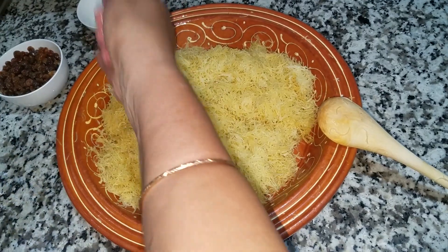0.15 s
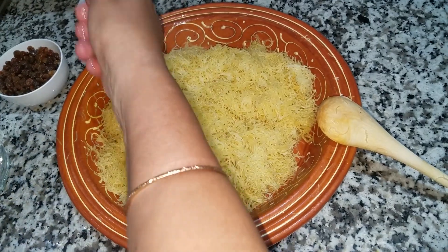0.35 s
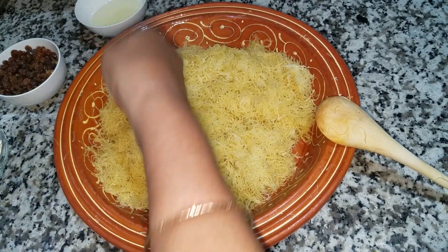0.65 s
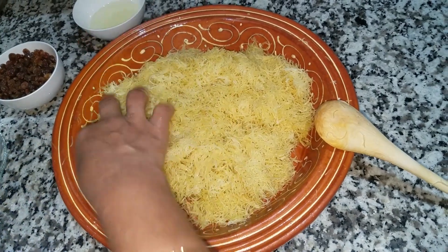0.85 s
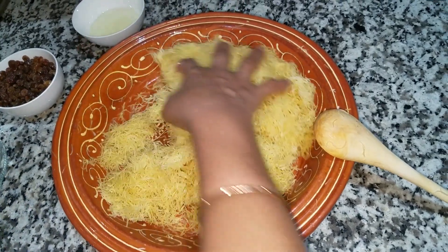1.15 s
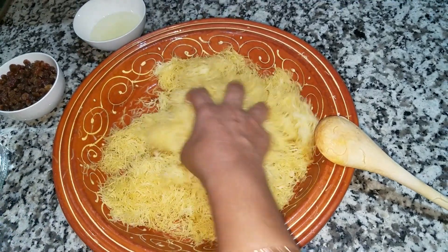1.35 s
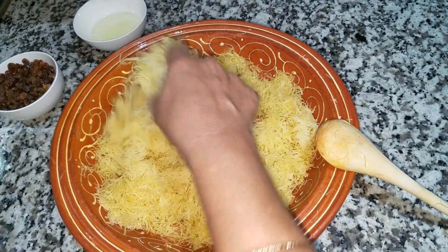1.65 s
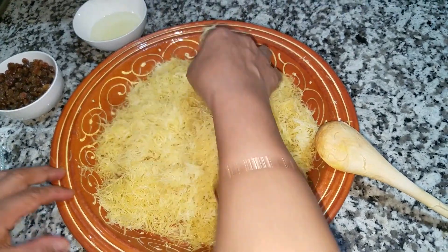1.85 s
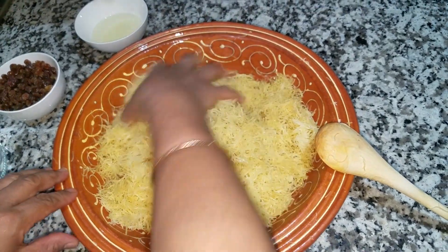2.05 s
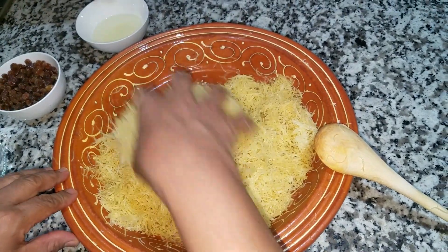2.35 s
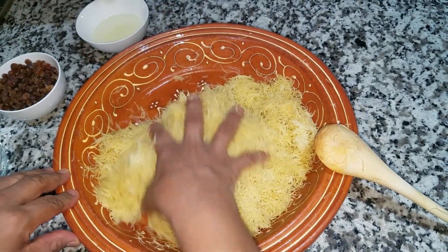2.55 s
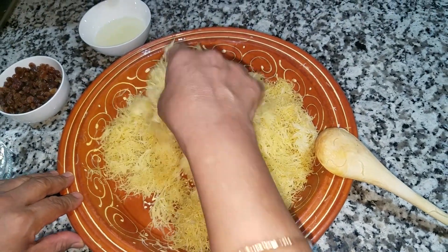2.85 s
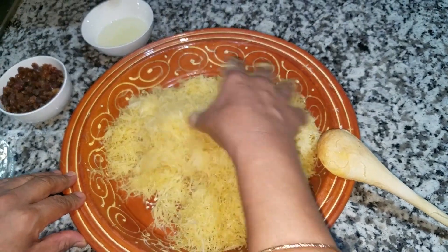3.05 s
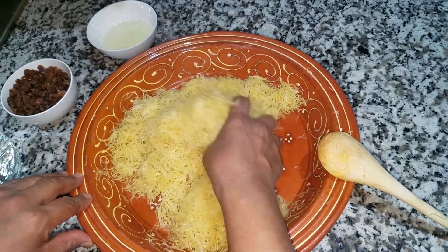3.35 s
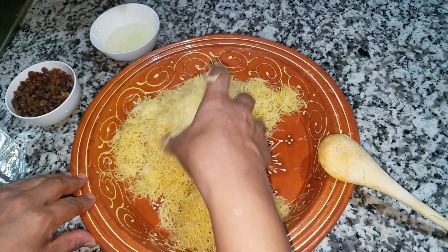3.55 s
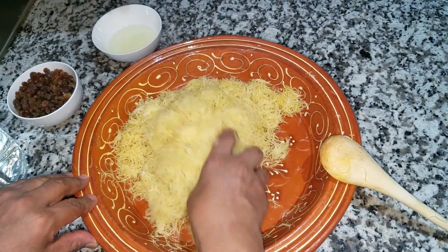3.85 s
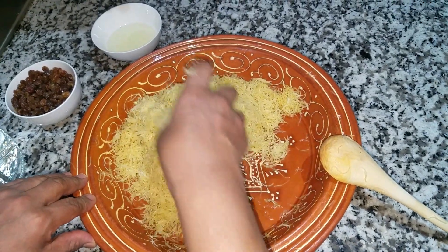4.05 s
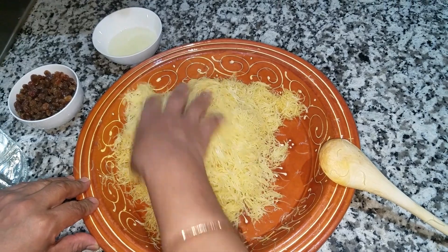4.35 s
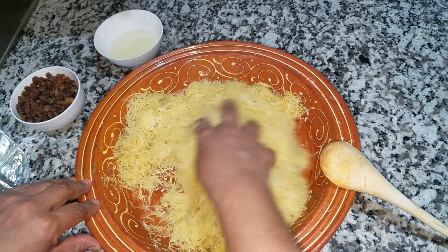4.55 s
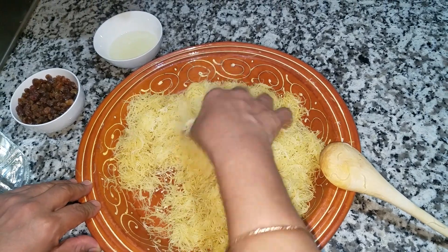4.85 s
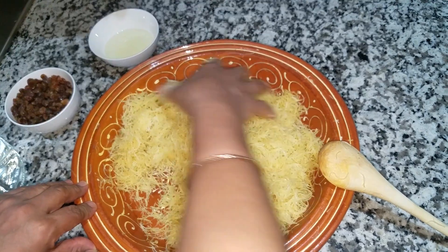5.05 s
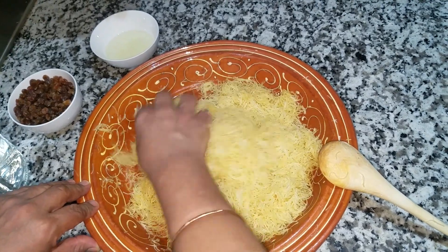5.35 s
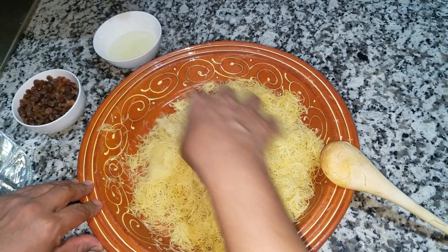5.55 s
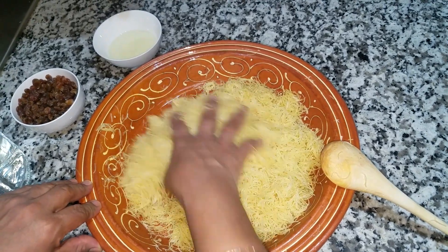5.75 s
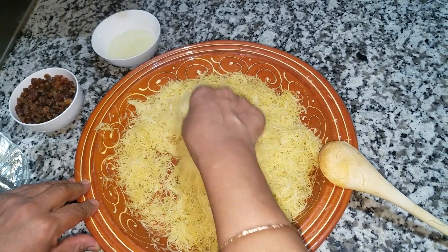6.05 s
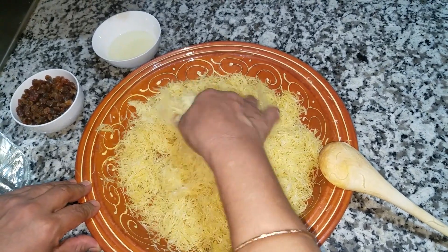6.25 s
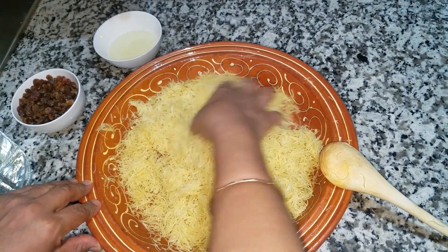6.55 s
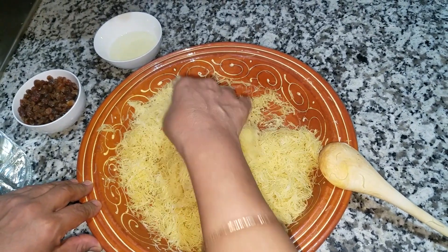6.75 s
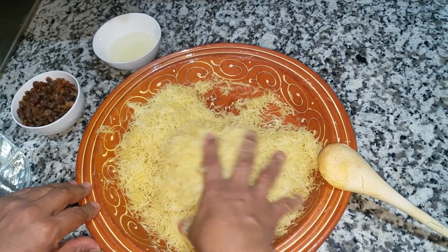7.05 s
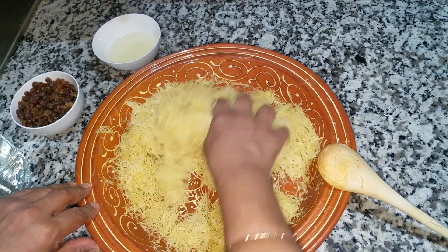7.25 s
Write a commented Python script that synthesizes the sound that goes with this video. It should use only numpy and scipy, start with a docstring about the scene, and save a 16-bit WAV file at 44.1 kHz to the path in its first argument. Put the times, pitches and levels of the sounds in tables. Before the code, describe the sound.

An earthenware dish knocks hard on a stone counter, then a hand rubs and tosses damp vermicelli with soft flops over a low hum

```python
"""A hand rubs and tosses damp steamed vermicelli in a wide earthenware dish on a stone counter.
Throughout: strands crackle and flop (shaped noise grains), snaps and thin tones (short sines), a hum over air.
First second: three hard dish knocks on the stone (damped thud modes, noise crack, beating clay modes).
From 2 s: bangle or nail clacks and fingertip bumps (short sines, rim modes, noise snap).
At 5.2 s: two softer knocks. A small hard kitchen (decaying noise) answers all but the humming appliance."""
import sys
import numpy as np
from scipy import signal
from scipy.fft import rfft, irfft, next_fast_len
from scipy.io import wavfile
from scipy.ndimage import uniform_filter1d

SR = 44100
rng = np.random.default_rng(int(sys.argv[2]) if len(sys.argv) > 2 else 0)


def file_out(sig):
    """Save sig as 16-bit WAV at sys.argv[1]."""
    # one column per channel
    cols = np.atleast_2d(sig).T
    # limit, then scale
    lim = np.clip(cols, -1, 1)
    pcm = np.round(lim * 32767).astype(np.int16)
    wavfile.write(sys.argv[1], SR, pcm)


N = 326117
TIME = np.arange(N) / SR
BRIEF = TIME[:SR]  # 1 s, long enough for one event
SIDES = np.array([[1], [-1]])  # left, right
# every pan_db is left minus right


# dead thud of dish and counter together: pitch_hz, t60_s, level_db (relative)
THUD_MODES = [(111.4, 0.15, -19.5), (235, 0.026, -12.5), (351, 0.04, -3.5), (487, 0.024, 3),
              (747, 0.016, 7), (991, 0.026, 1.5), (1304, 0.011, 9), (1833, 0.033, 2)]
# colour of the crack: freq_hz, level_db
CRACK_COLOUR = [(100, 1), (900, -8.5), (2200, -4), (3200, -12), (5000, -13.5), (8000, -15), (15000, -27)]
FOOT_HZ = 92  # the dish is too small to radiate below this
THUD_RISE_S, RING_RISE_S = .0009, .003  # time constants: the blow spreads through the dish


def knocks(crack_t60_s=0.084, lag_s=0.00023):
    """The foot of the dish hits the stone: thud and crack, dulled by a soft landing, then the clay rings."""
    thuds, rings = np.zeros((2, N)), np.zeros((2, N))
    hz, t60_s, mode_db = np.transpose(THUD_MODES)
    turn = np.pi * np.arange(len(THUD_MODES))[:, None]  # neighbouring modes swing in opposite directions
    half_lag = np.pi * hz[:, None] * lag_s
    thud = np.array([ring(hz, t60_s, mode_db, turn + side * half_lag) for side in (1, -1)])
    thud_rise = 1 - np.exp(-BRIEF / THUD_RISE_S)
    ring_rise = 1 - np.exp(-BRIEF / RING_RISE_S)
    radiate = signal.butter(2, FOOT_HZ, "high", fs=SR, output="sos")
    for s, level_db, contact_hz, crack_db, pan_db in bounces():
        crack = unit(colour(diffuse(SR), CRACK_COLOUR)) * undb(crack_db - 60 * BRIEF / crack_t60_s)
        soften = signal.butter(2, contact_hz, fs=SR, output="sos")
        blow = signal.sosfilt(np.vstack([soften, radiate]), (thud + crack) * thud_rise)
        add(thuds, s, pan(undb(level_db) * blow, pan_db))
    for (s, _, _, ring_db, *_), spot in zip(KNOCKS, KNOCK_SPOTS):
        add(rings, s, undb(ring_db) * clay(spot) * ring_rise)
    ring_echo = kitchen(rings, early_db=-19, late_db=-17)
    thud_echo = kitchen(thuds, early_db=-1.5, late_db=-2.5)
    return thuds + rings + ring_echo + thud_echo


# the dish lands and rocks: start_s, thud_db, contact_cutoff_hz, ring_db, crack_db (relative),
# pan_db, first_gap_s, step_db (per bounce)
KNOCKS = [(0.33, -13, 2400, 1, -7, 3, .0048, -7), (.383, -18.5, 2200, -13.5, -23.5, 6, .008, -5.5),
          (0.7075, -19, 2100, -.5, -7.5, 3.5, .004, -2.5), (5.1881, -25, 937, 1, -0.5, -5, .02, -6.5),
          (5.251, -32.5, 1150, -32, -5, 0, .024, -14)]
# spot of the foot that lands at each knock: index 0..2
KNOCK_SPOTS = [0, 0, 1, 2, 2]
BOUNCE_SHRINK = 0.89  # each gap as a share of the one before


def bounces(count=3):
    """Each knock is a run of contacts, ever weaker and closer together."""
    for s, level_db, contact_hz, _, crack_db, pan_db, gap_s, step_db in KNOCKS:
        for k in range(count):
            yield s, level_db + k * step_db, contact_hz, crack_db, pan_db
            s = s + gap_s * BOUNCE_SHRINK ** k


# ring of the dish: pitch_hz, t60_s, twin_db (relative), spot0_db, spot1_db, spot2_db
DISH_MODES = [(124, 0.31, -6.5, -36.5, -39, -31), (208.3, 0.33, -4.5, -25, -30.5, -33.5),
              (297.5, 0.29, -11.5, -22.5, -47, -34.5), (349, 0.28, -8, -21, -20.5, -25.5),
              (430, 0.22, -9, -30.5, -23, -40), (496, 0.28, -16, -27, -41, -24),
              (548.4, 0.38, -21.5, -27.5, -26, -36), (580, 0.29, -22, -34, -28, -44),
              (655, 0.3, -10, -33, -34, -50), (708, 0.17, -10.5, -40, -29.5, -30.5),
              (768, 0.17, -25, -38, -31, -54), (876, 0.51, -33.5, -27.5, -36.5, -51),
              (915, 0.65, -1, -24.5, -49, -65), (1015, 0.27, -10.5, -28, -49, -54),
              (1273, 0.94, -10, -40, -56, -59.5), (1426, 0.28, -13, -14, -31, -46),
              (1600, 0.49, -9.5, -38, -47.5, -58), (1600, 0.31, -13, -46, -59, -54),
              (1774, 0.33, 3, -35, -31, -61), (2037, 0.42, 3, -30.5, -39.5, -72),
              (2195, 0.62, 0, -43.5, -52, -63), (3190, 0.32, -16, -41, -56, -66),
              (3440, 0.49, -3.5, -48.5, -59, -76), (4160, 0.87, -5.5, -59, -63, -83),
              (5100, 0.27, -10, -66.5, -70.5, -83), (6180, 0.22, 0.5, -58, -58, -84)]


def clay(spot, split=0.00645, lean_db=-5.5):
    """The dish is not quite round, so each ringing mode beats with a close twin."""
    hz, t60_s, twin_db, *spot_db = np.transpose(DISH_MODES)
    # short waves leave in different phase and strength to left and right
    apart = np.minimum(hz / 1400, 1)
    lag = (0.79 * apart * rng.choice([-1, 1], len(hz)))[:, None]
    start = rng.uniform(0, 2 * np.pi, (len(hz), 1))
    ears = []
    for side in (1, -1):
        level_db = spot_db[spot] + side * apart * lean_db / 2
        phase = start + side * lag
        twin = ring(hz * (1 - split), t60_s, level_db + twin_db, phase)
        ears.append(ring(hz, t60_s, level_db, phase) - twin)
    return np.array(ears)


# ring of a light hard tap on the rim: pitch_hz, t60_s, level_db (relative)
RIM_MODES = [(809, 0.034, -7), (843, 0.09, -19), (1546, 0.043, -11), (1626, 0.4, -31), (2140, 0.15, -23),
             (2490, 0.091, -13), (2610, 0.25, -23), (3070, 0.053, -19.5), (3700, 0.13, -27),
             (3940, 0.047, -17), (5290, 0.043, -22), (7000, 0.15, -32), (8200, 0.076, -29)]
# colour of snap and graze: freq_hz, level_db
SNAP_COLOUR = [(200, 3), (1000, 13.5), (2800, 0.5), (4500, -4), (6000, -16), (12000, -10), (15500, -17)]
SING_DB, SING_T60_S = -12, 0.16  # the main pitch lingers


def taps(clack_t60_s=0.017, snap_db=-9, snap_t60_s=0.08, graze_db=-17, graze_s=0.01):
    """Each light contact grazes, then snaps, clacks, sings on and excites its own mix of rim modes."""
    out = np.zeros((2, N))
    hz, t60_s, mode_db = np.transpose(RIM_MODES)
    for s, tap_db, main_hz, rim_db, pan_db in touches():
        tap_hz = hz * (1 + .01 * rng.standard_normal(len(hz)))
        tap_mode_db = mode_db + 1.2 * rng.standard_normal(len(hz))
        phases = rng.uniform(0, 2 * np.pi, (2, len(hz), 1))
        rim = np.array([ring(tap_hz, t60_s, tap_mode_db, phase) for phase in phases])
        grit = unit(colour(rng.standard_normal((2, SR)), SNAP_COLOUR))
        snap = grit * undb(snap_db - 60 * BRIEF / snap_t60_s)
        clack = ring(main_hz, clack_t60_s, 0) + ring(main_hz, SING_T60_S, SING_DB)
        add(out, s, pan(undb(tap_db) * (clack + undb(rim_db) * (rim + snap)), pan_db))
        # the skid over the glaze swells until the strike
        graze = grit * undb(tap_db + rim_db + graze_db) * np.exp((BRIEF - 1) / graze_s)
        add(out, s - 1, graze)
    # a light touch cannot shake the whole dish
    out = signal.sosfilt(signal.butter(2, 300, "high", fs=SR, output="sos"), out)
    return out + kitchen(out, early_db=-2.5, late_db=-7.0)


# bangle or nail strikes the rim and falls back on it: start_s, level_db, pitch_hz, rim_db (relative),
# pan_db, rebound_gap_s, rebound_db (relative), rebound_pitch_hz
CLACKS = [(1.954, -40.5, 1150, 3.5, -3, .039, -1, 2170), (2.636, -42.5, 840, 6, -1, 0.016, -2.5, 1550),
          (3.3153, -36.5, 1552, 0, -2, 0.02, -5.5, 837), (3.834, -42, 1554, 0, -4, .005, -4.5, 2530),
          (6.5996, -30, 1680, 2.5, 12, .0142, -2, 863)]
# fingertips bump the dish through the strands: start_s, level_db, pitch_hz
BUMPS = [(1.974, -37, 490), (3.725, -43, 1100), (4.388, -43.5, 535), (4.469, -43, 517), (6.477, -37.5, 490),
         (6.5212, -37.5, 494)]
BRUSH_S, BRUSH_DB, BRUSH_RIM_DB, BRUSH_HZ = .005, -12.5, 6, 853  # light first brush, this long before
REBOUND_RIM_DB, REBOUND_PAN = -1.5, .6  # less rim; share of the strike's pan_db
BUMP_RIM_DB, BUMP_PAN_DB = -6.5, 0.5


def touches():
    """Bangle or nail brushes, strikes and rebounds; a fingertip bumps once."""
    for s, level_db, hz, rim_db, pan_db, gap_s, rebound_db, rebound_hz in CLACKS:
        yield s - BRUSH_S, level_db + BRUSH_DB, BRUSH_HZ, rim_db + BRUSH_RIM_DB, 0
        yield s, level_db, hz, rim_db, pan_db
        yield s + gap_s, level_db + rebound_db, rebound_hz, rim_db + REBOUND_RIM_DB, pan_db * REBOUND_PAN
    for s, level_db, hz in BUMPS:
        yield s, level_db, hz, BUMP_RIM_DB, BUMP_PAN_DB


# strokes of the hand: peak_s, rub_db, flop_db (both before STRAND_DB), swell_s
STROKES = [(.235, -62, -76.5, .06), (.58, -63.5, -66.5, 0.099), (1.38, -68.5, -59, 0.064),
           (2.1, -69, -56, 0.046), (2.7, -72, -64, .09), (3.28, -70, -70, .06), (3.7, -70, -60, 0.12),
           (4.5, -73, -56.5, 0.049), (5.26, -60, -66, 0.035), (5.82, -72, -58.5, 0.083),
           (6.5, -67, -54, 0.025), (7.19, -70, -52.5, 0.027)]
# colours of crackle and of falling handfuls: freq_hz, level_db
RUB_COLOUR = [(500, -11), (2000, 2), (4000, 2), (7000, -2.5), (10000, -0.5), (15000, 2)]
FLOP_COLOUR = [(150, -4), (480, 0.5), (620, -4), (830, 5.5), (1150, -3.5), (1550, 0), (2200, -14.5),
               (5000, -24.5), (15000, -29.5)]
RUB_LAG_S = .025  # the crackle peaks just after the handful lands
STRAND_DB = -5.5  # direct sound only


def vermicelli(rub_pan_db=2):
    """Damp strands crackle under the fingers and flop softly back into the dish."""
    rub_effort, flop_effort = np.zeros(N), np.zeros(N)
    for s, rub_db, flop_db, swell_s in STROKES:
        rub_effort += undb(rub_db) * swell(s + RUB_LAG_S, swell_s)
        flop_effort += undb(flop_db) * swell(s, swell_s)
    rubbing = strands(rub_effort, RUB_COLOUR, per_s=3800, spread_db=5.5)
    falling = strands(flop_effort, FLOP_COLOUR, per_s=820, spread_db=2.5)
    out = pan(rubbing, rub_pan_db) + falling
    return undb(STRAND_DB) * out + kitchen(out, early_db=-5, late_db=-2.5)


def strands(effort, points, per_s, spread_db):
    """A crowd of tiny contacts of uneven size, swelling with each stroke of the hand."""
    sizes = undb(spread_db * np.minimum(rng.exponential(size=N), 5))
    sizes = sizes * (rng.random(N) < per_s / SR)
    shared, separate = rng.standard_normal(N), rng.standard_normal((2, N))
    return effort * unit(colour(sizes * (shared + 2.5 * separate), points))


RELEASE = 1.46  # fall time / rise time


def swell(s, swell_s):
    """Effort of one stroke: a bell curve up to time s that lets go more slowly."""
    width_s = np.where(TIME < s, swell_s, RELEASE * swell_s)
    return np.exp(-.5 * ((TIME - s) / width_s) ** 2)


# clearest tiny snaps and longer thin tones: start_s, level_db, pitch_hz, t60_s, pan_db
TICKS = [(.0952, -43, 7500, 0.00088, 15), (0.1825, -48, 12600, .003, 14), (.209, -59.5, 9050, 0.028, 19),
         (0.2956, -51.5, 4800, 0.0037, 3), (.632, -58, 5196, .035, 14), (4.1806, -46.5, 11600, 0.00073, 18),
         (4.2858, -41, 14300, .0017, 17), (4.324, -50, 14500, .003, 11)]


def ticks(beside_db=-9):
    """Tiny wet snaps of sticky strands; a few longer thin tones, perhaps a bangle jingling."""
    out = np.zeros((2, N))
    for s, level_db, hz, t60_s, pan_db in TICKS + faint_ticks():
        beside_hz = hz * (1 + .1 * rng.standard_normal(3))  # weaker pitches close beside
        tick = ring(hz, t60_s, level_db) + ring(beside_hz, t60_s, level_db + beside_db)
        add(out, s, pan(tick, pan_db))
    return out + kitchen(out, early_db=-6, late_db=-7)


FAINT_PER_S, FAINT_DB, FAINT_T60_S, FAINT_PAN_DB = 1.3, -55.5, 0.0032, 7
FAINT_LOW_HZ, FAINT_HIGH_HZ = 6000, 13600


def faint_ticks():
    """Small snaps at chance moments and pitches."""
    snaps = []
    for when, high in rng.random((int(FAINT_PER_S * N / SR), 2)):
        hz = FAINT_LOW_HZ + high * (FAINT_HIGH_HZ - FAINT_LOW_HZ)
        snaps.append((when * N / SR, FAINT_DB, hz, FAINT_T60_S, FAINT_PAN_DB))
    return snaps


# hum lines: pitch_hz, level_db (rms)
HUM_LINES = [(99.8, -59), (245.5, -63), (295, -78.5), (343, -88), (443, -68), (491.5, -75), (590, -74),
             (795, -86), (1835, -88), (3095, -83)]
# colour of the air: freq_hz, level_db
AIR_COLOUR = [(20, -9), (32, -6), (55, -10), (100, -1), (175, -10), (270, -4), (400, -9), (700, -16),
              (1100, -18), (3000, -22), (3800, -28), (5500, -33.5), (10000, -37.5), (14000, -33.5)]


def appliance(air_db=-56.5, waver_db=2.0, drift_rad=0.85, hum_pan_db=-1):
    """A motor hums on a few lines, wavering in level and phase, over a soft rush of air."""
    hum = np.zeros(N)
    for hz, level_db in HUM_LINES:
        amplitude = np.sqrt(2) * undb(level_db + waver_db * waver(5.4))
        hum += amplitude * np.sin(2 * np.pi * (hz * TIME + rng.random()) + drift_rad * waver(9))
    air = unit(colour(diffuse(next_fast_len(N)), AIR_COLOUR))[:, :N]
    return pan(hum, hum_pan_db) + undb(air_db) * air


def waver(rate_hz):
    """Slow chance of rms 1: held random values, smoothed over one hold."""
    hold = int(SR / rate_hz)
    steps = np.repeat(rng.standard_normal(N // hold + 1), hold)
    return unit(uniform_filter1d(steps, hold)[:N])


# tail of the room: freq_hz, t60_s
KITCHEN_DECAY = [(100, 0.83), (400, 0.55), (1000, 0.37), (2500, 0.68), (6000, 0.95), (15000, 0.23)]


def kitchen(x, early_db, late_db, early_t60_s=0.15):
    """Quick reflections off counter and tiles, then the tail of the room, each band with its own decay."""
    spectrum, hz = rfft(diffuse(SR)), bins(BRIEF)
    centres_hz = np.geomspace(100, 16000, 9)
    tail = 0
    for centre_hz, share in zip(centres_hz, np.eye(len(centres_hz))):
        band = irfft(spectrum * along(np.c_[centres_hz, share], hz), SR)
        tail = tail + band * undb(-60 * BRIEF / along(KITCHEN_DECAY, centre_hz))
    tail = tail * np.minimum(BRIEF / 0.0072, 1)
    early = diffuse(SR) * undb(-60 * BRIEF / early_t60_s) * (BRIEF > .0015)
    response = undb(early_db) * unit(early) + undb(late_db) * unit(tail)
    return signal.fftconvolve(x.mean(axis=0)[None], response / np.sqrt(SR), axes=1)[:, :N]


# left-right balance of diffuse sound: freq_hz, pan_db
DIFFUSE_LEAN = [(100, -1), (200, -6), (400, 0), (800, -2.5), (1400, -4), (2400, -3), (4400, -5),
                (8000, -4.5), (14000, 3)]


def diffuse(size, alike_hz=720):
    """Noise from all around: left and right agree only on long waves."""
    noise = rng.standard_normal((2, size))
    hz = bins(noise)
    alike = .98 * np.exp(-(hz / alike_hz) ** 2)
    mid, side = rfft(noise)
    both = mid * np.sqrt(1 + alike) + SIDES * side * np.sqrt(1 - alike)
    return irfft(pan(both, along(DIFFUSE_LEAN, hz)), size)


def ring(hz, t60_s, level_db, phase=0):
    """Sum of freely decaying modes."""
    hz, t60_s, level_db = (np.reshape(v, (-1, 1)) for v in (hz, t60_s, level_db))
    decay = undb(level_db - 60 * BRIEF / t60_s)
    return np.sum(decay * np.sin(2 * np.pi * hz * BRIEF + phase), axis=0)


def undb(db):
    """Decibels to gain."""
    return 10 ** (np.asarray(db) / 20)


def unit(x):
    """Scale to rms 1."""
    return x / np.sqrt(np.mean(x ** 2))


def along(points, hz):
    """Read (Hz, value) points on a log-frequency axis."""
    f, value = np.transpose(points)
    return np.interp(np.log(hz + 1), np.log(f), value)


def bins(x):
    """Frequencies (Hz) of the spectrum of x."""
    return np.fft.rfftfreq(x.shape[-1], 1 / SR)


def colour(x, points):
    """Give x a smooth spectrum."""
    return irfft(rfft(x) * undb(along(points, bins(x))), x.shape[-1])


def pan(x, pan_db):
    """Place a sound by level between left and right."""
    return x * undb(SIDES * pan_db / 2)


def add(track, s, sound):
    """Mix a sound in at time s."""
    i = int(s * SR)
    track[..., i:i + sound.shape[-1]] += sound[..., :N - i]


def scene():
    """Dish, hand and vermicelli in the humming kitchen."""
    return knocks() + taps() + vermicelli() + ticks() + appliance()


TOP_HZ = 15900


def record(dry):
    """A steep low-pass cuts the very top."""
    return signal.sosfilt(signal.ellip(10, .2, 70, TOP_HZ, fs=SR, output="sos"), dry)


dry = scene()
out = record(dry)
file_out(out)
```